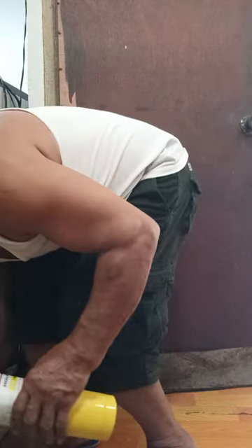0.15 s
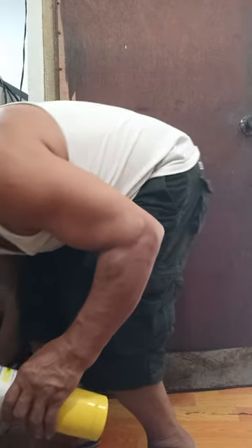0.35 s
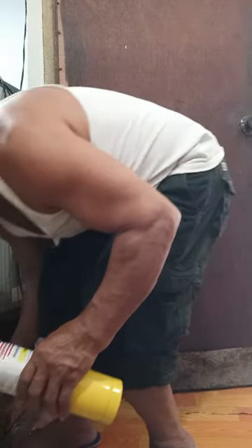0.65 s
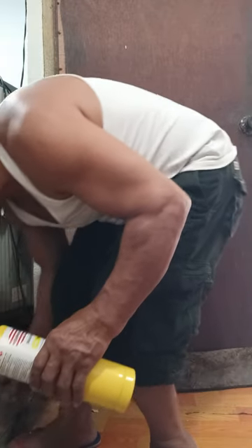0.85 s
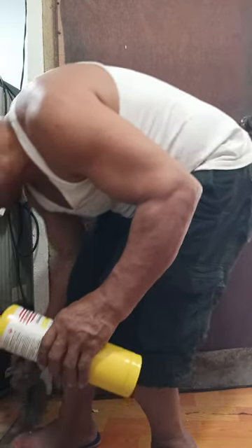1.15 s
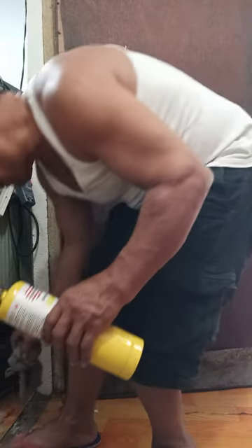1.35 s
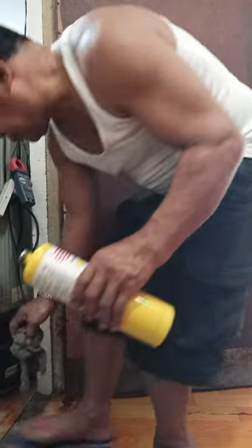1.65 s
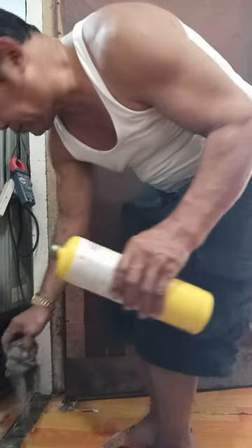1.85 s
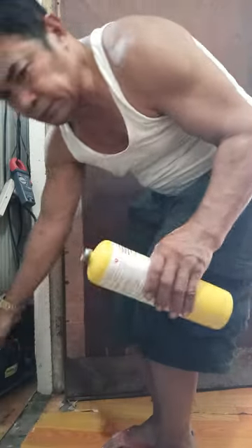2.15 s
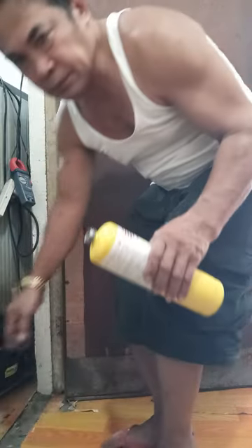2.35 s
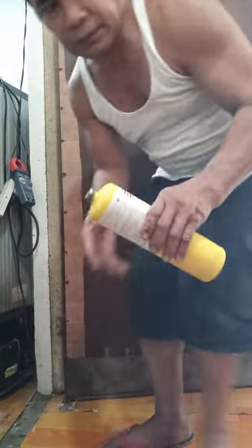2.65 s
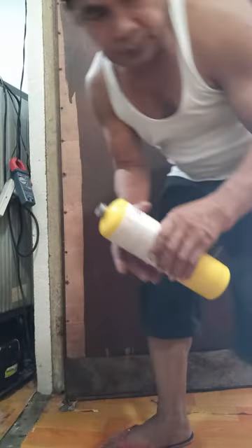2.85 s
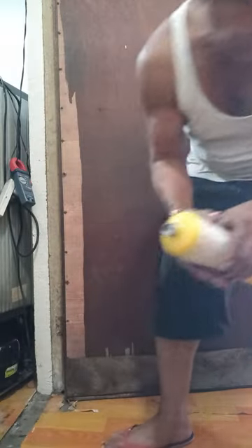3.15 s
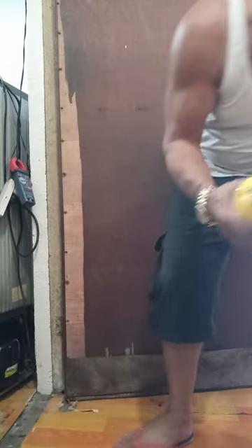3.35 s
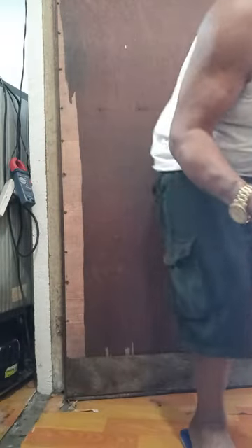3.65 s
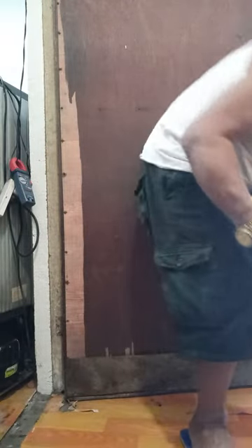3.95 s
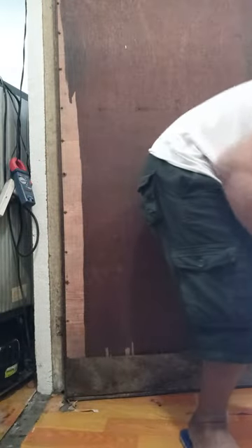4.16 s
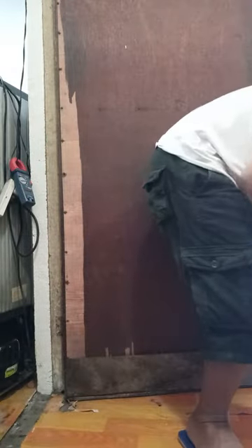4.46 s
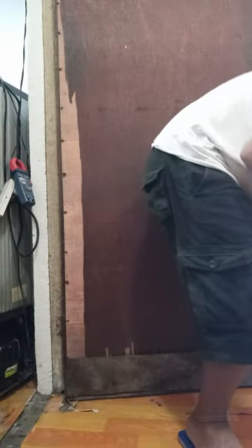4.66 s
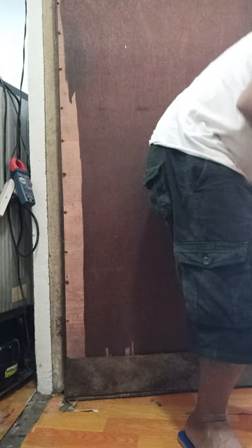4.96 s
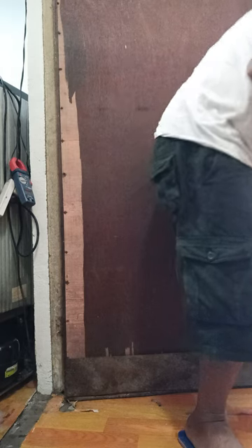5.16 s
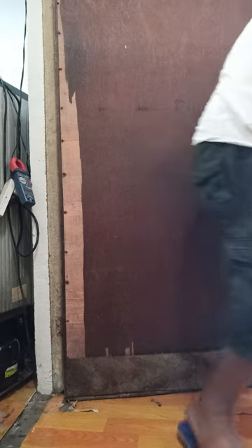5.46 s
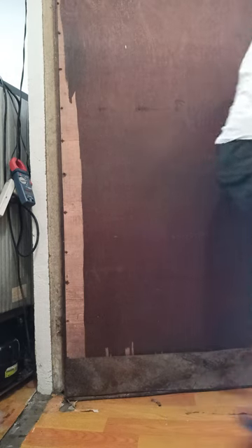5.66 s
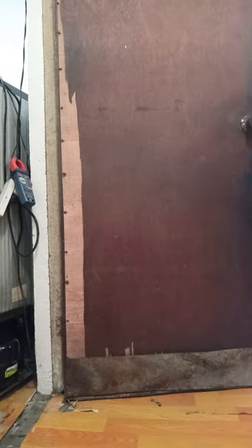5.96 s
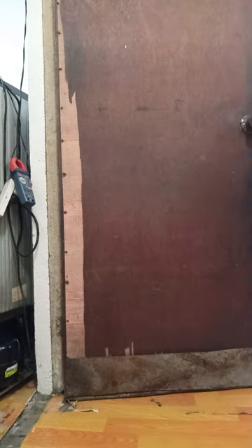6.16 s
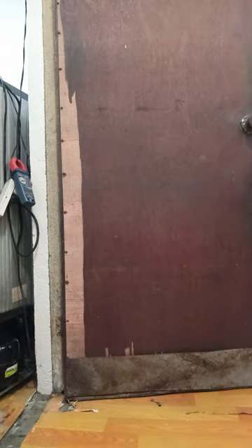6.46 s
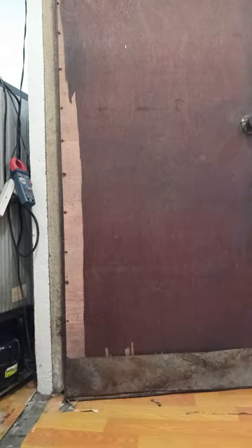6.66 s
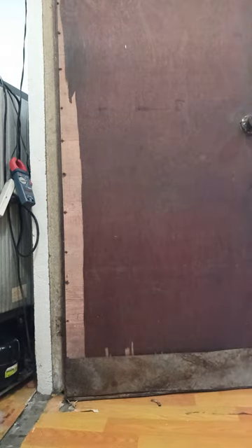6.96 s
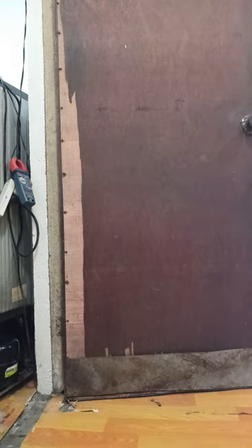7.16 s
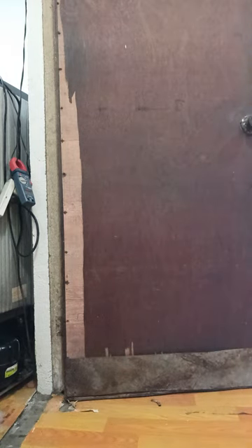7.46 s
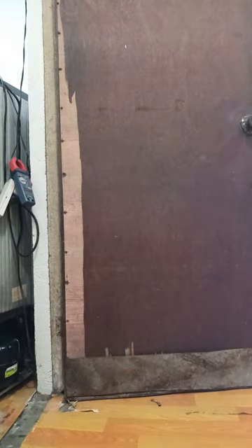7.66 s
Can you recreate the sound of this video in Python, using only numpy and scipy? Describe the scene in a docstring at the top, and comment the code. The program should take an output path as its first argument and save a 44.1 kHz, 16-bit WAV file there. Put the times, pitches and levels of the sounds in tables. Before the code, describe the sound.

Over constant machine hum and rushing air, one hard clack on the floor gives way to soft shuffles, small dry ticks and a late dull tap.

```python
"""Sandalled steps on a hard floor: one sharp clack, then a shuffle of light ticks, scuffs and rustles.
Each contact rings modes of floor and sole and adds a crack; friction is shaped noise; a small room answers.
Behind them a refrigerator runs: a compressor hums on lines locked to its shaft, and coloured noise
makes the hiss and murmur of moving air. A low fan tone sinks in the first seconds, then partly returns."""
import sys
import numpy as np
from scipy import signal
from scipy.fft import rfft, irfft, next_fast_len
from scipy.io import wavfile
from scipy.ndimage import uniform_filter1d

SR = 44100
rng = np.random.default_rng(int(sys.argv[2]) if len(sys.argv) > 2 else 0)


def persist_wave(psi):
    """Save psi, clipped to +-1, as 16-bit WAV."""
    counts = np.round(np.clip(psi, -1, 1) * 32767).astype(np.int16)
    wavfile.write(sys.argv[1], SR, np.atleast_2d(counts).T)


N = 344817
TIME = np.arange(N) / SR  # seconds


def amp(db):
    """Turns decibels into linear gain."""
    return 10 ** (np.asarray(db) / 20)


def evened(x):
    """Scales a signal to rms 1, over all its channels together."""
    return x / np.sqrt(np.mean(x ** 2) + 1e-20)


def read(points, hz):
    """Reads a curve of (frequency, value) points on a log-frequency axis."""
    point_hz, value = np.transpose(points)
    return np.interp(np.log(hz + 1), np.log(point_hz + 1), value)


def add(mix, start_s, sound):
    """Mixes a sound in at its start time, cut off at the end of the mix."""
    part = mix[..., max(round(start_s * SR), 0):][..., :sound.shape[-1]]
    part += sound[..., :part.shape[-1]]


def drift(top_hz):
    """Slow random wander of rms 1: a sum of sines no faster than top_hz."""
    t = TIME[::256]
    slow = np.zeros(len(t))
    for hz in np.geomspace(top_hz / 10, top_hz, 20):
        slow += np.sin(2 * np.pi * (hz * t + rng.random())) / np.sqrt(hz)
    return np.interp(TIME, t, evened(slow))


# How alike left and right are across the spectrum: pitch_hz [Hz], likeness [-1 to 1]
STEREO_LIKENESS = [(60, 0.82), (130, 1), (290, 0.7), (640, 0.29), (1400, -0.35), (2600, 0.057),
                   (15000, -0.032)]
# Left-over-right tilt across the spectrum: pitch_hz [Hz], left_right_db [dB]
STEREO_BALANCE = [(200, -3), (340, 10.5), (480, -1.5), (800, -1), (1400, 2), (3000, -1), (5500, 1),
                  (7300, 4), (8500, 0), (15000, -0.5)]


def pair(x, gain_db):
    """Colours two unrelated signals by gain_db(hz) and makes their bass alike, as at two close ports."""
    length = x.shape[-1]
    size = next_fast_len(length)
    hz = np.fft.rfftfreq(size, 1 / SR)
    first, second = rfft(x, size)
    likeness = np.clip(read(STEREO_LIKENESS, hz), -1, 1)
    mid = first * np.sqrt((1 + likeness) / 2)
    side = second * np.sqrt((1 - likeness) / 2)
    lean = amp(read(STEREO_BALANCE, hz) / 2)
    stereo = np.array([(mid + side) * lean, (mid - side) / lean])
    return irfft(stereo * amp(gain_db(hz)), size)[:, :length]


def murmur(level_db=-53, low_hz=205, high_hz=480, width_hz=12.7, swell_db=4.5, swell_hz=2.5, count=6):
    """Narrow bands of the low rush swell and sink, each by its own chance."""
    def band(centre_hz):
        def bell(hz):
            return -12 * np.minimum(((hz - centre_hz) / width_hz) ** 2, 10)
        noise = pair(rng.standard_normal((2, N)), bell)
        return evened(noise * amp(swell_db * drift(swell_hz)))
    bands = sum(band(hz) for hz in np.geomspace(low_hz, high_hz, count))
    return amp(level_db) * evened(bands)


# Broad colour of the rushing air: pitch_hz [Hz], relative_level_db [dB per Hz]
AIR_COLOUR = [(20, -17), (45, -24), (70, -4.5), (170, -11), (240, -2.5), (400, -5.5), (560, -0.5),
              (900, 0.5), (1100, -3.5), (1700, -5.5), (2700, -11.5), (4400, -12), (8000, -17.5),
              (15500, -19)]
# Cabinet and room resonances in that rush: pitch_hz [Hz], width_hz [Hz], lift_db [dB]
CABINET_RESONANCES = [(229, 7.7, 4), (278, 47, 4.5), (302, 20, -6), (370, 40, 6), (463, 15, 10),
                      (510, 8.4, -2.5), (756, 10, 2), (1490, 62, 2.5), (1694, 20, 6), (1915, 25, 3),
                      (2068, 42, 4)]


def air(start_db=-37.5, fall_db_per_s=0.14, flutter_db=0.5, flutter_hz=14.0):
    """Turbulent air as noise coloured by resonances; it eases very slowly and flutters a little."""
    def colour(hz):
        curve_db = read(AIR_COLOUR, hz)
        for centre_hz, width_hz, lift_db in CABINET_RESONANCES:
            curve_db += lift_db / (1 + (2 * (hz - centre_hz) / width_hz) ** 2)
        return curve_db
    rush = evened(pair(rng.standard_normal((2, N)), colour))
    return rush * amp(start_db - fall_db_per_s * TIME + flutter_db * drift(flutter_hz))


# Fader ride of the low fan tone, before its trim and waver: time_s [s], level_db [dB]
FAN_RIDE = [(0, -40.5), (1.35, -45), (1.8, -59), (2.8, -54.5), (3.2, -68), (3.8, -60), (6.3, -56.5),
            (7.82, -52.5)]
FAN_START_HZ, FAN_SAG_HZ_PER_S = 76.9, 0.07
DRONE_HZ = 63.3


def fan(trim_db=-0.5, waver_db=3.0, waver_hz=3.0, octave_db=-61, octave_share=0.22,
        drone_db=-65, drone_share=0.8, third_db=-2):
    """The wavering blade tone; its weak octave and a drone below it follow its level in part."""
    ride_s, ride_db = np.transpose(FAN_RIDE)
    level_db = np.interp(TIME, ride_s, ride_db)
    mean_db = level_db.mean()
    excess_db = level_db - mean_db
    angle = 2 * np.pi * np.cumsum(FAN_START_HZ - FAN_SAG_HZ_PER_S * TIME) / SR
    # the waver ignores the ride, so it shows most when the tone is faint
    waver = amp(mean_db) * (amp(waver_db * drift(waver_hz)) - 1)
    blades = amp(trim_db) * (amp(level_db) + waver) * np.sin(angle)
    octave = amp(octave_db + octave_share * excess_db) * np.sin(2 * angle)
    turn = 2 * np.pi * (DRONE_HZ * TIME + rng.random())
    drone = np.sin(turn) + amp(third_db) * np.sin(3 * turn)
    return np.sqrt(2) * (blades + octave + amp(drone_db + drone_share * excess_db) * drone)


SHAFT_HZ = 57.48
# Compressor lines: shaft_multiple [x shaft speed], level_db [dB], left_right_db [dB]
HUM_LINES = [(1, -59, -0.5), (1.5, -83, 4), (2, -51.5, 1), (3, -62.5, 0), (3.5, -64.5, -1), (4, -59.5, 0.5),
             (5, -49.5, -0.5), (6, -56.5, 0.5), (8, -60.5, 3), (9, -60, 12.5), (12, -66.5, 14),
             (13, -63, -5)]
WHINE_LINE = (46, -68, 12)  # a thin whine high on the same series, same columns


def compressor(sway_turns=0.016, sway_hz=1.505, waver_db=1.0, waver_hz=3.0):
    """Lines locked to whole and half orders of the shaft; its speed sways and each line wavers."""
    turns = SHAFT_HZ * TIME + sway_turns * drift(sway_hz)
    out = np.zeros((2, N))
    for multiple, level_db, left_right_db in HUM_LINES + [WHINE_LINE]:
        line = np.sqrt(2) * np.sin(2 * np.pi * (multiple * turns + rng.random()))
        pan = amp([[left_right_db / 2], [-left_right_db / 2]])
        out += line * amp(level_db + waver_db * drift(waver_hz)) * pan
    return out


# Reverberation by band: pitch_hz [Hz], t60_s [s]
ROOM_DECAY = [(150, 0.59), (600, 0.34), (2000, 0.27), (7000, 0.35), (15000, 0.25)]
# Single early reflections off floor, door and walls: left_delay_s [s], right_delay_s [s], level_db [dB]
EARLY_ECHOES = [(.0047, 0.0035, -11), (.0068, 0.0084, -8.5), (0.015, .0146, -12)]


def room(x, wet_db=-1.5, first_s=0.002):
    """A few single reflections and a dense tail, each band dying at its own speed."""
    size = SR // 2
    t = np.arange(size) / SR
    signs = rng.choice([-1., 1.], (2, size))
    taps = signs * (rng.random((2, size)) < 1 / 10) * (t > first_s)
    hz, at_s, bands = signal.stft(pair(taps, np.zeros_like), SR, nperseg=256)
    decay = amp(-60 * at_s / read(ROOM_DECAY, hz)[:, None])
    tail = signal.istft(bands * decay, SR, nperseg=256)[1]
    tail *= amp(wet_db) * np.sqrt(2) / np.linalg.norm(tail)
    for left_s, right_s, level_db in EARLY_ECHOES:
        add(tail[0], left_s, amp([level_db]))
        add(tail[1], right_s, amp([level_db]))
    return signal.fftconvolve(x[None], tail, axes=1)[:, :N]


# Booms of the floor where weight comes down: start_s [s], pitch_hz [Hz], level_db [dB]
FLOOR_BOOMS = [(1.895, 178, -27), (2.868, 122, -32), (7.23, 224, -39)]


def booms(rise_s=0.005, t60_s=0.14):
    """One low mode of the floor swells and dies under each heavy step."""
    t = np.arange(SR // 2) / SR
    out = np.zeros(N)
    for start_s, pitch_hz, level_db in FLOOR_BOOMS:
        envelope = (1 - np.exp(-t / rise_s)) * amp(level_db - 60 * t / t60_s)
        add(out, start_s, envelope * np.sin(2 * np.pi * pitch_hz * t))
    return out


# Scuffs of sandals and cloth, fizz before its lift:
# peak_s [s], rise_s [s], decay_s [s], rasp_db [dB], hiss_db [dB], fizz_db [dB]
SCUFF_STROKES = [(2.63, 0.14, .055, -43, -56, -52), (2.872, .028, .032, -38.5, -41, -52),
                 (3.249, 0.026, 0.052, -37, -30.5, -43.5), (3.595, 0.072, 0.076, -45, -48, -47.5),
                 (3.738, 0.068, 0.04, -32.5, -34, -34), (3.918, 0.049, 0.036, -37, -44, -41),
                 (5.6, 0.063, 0.036, -44, -51, -51), (5.885, .04, .05, -47, -49, -45),
                 (6.19, 0.057, .07, -48, -46, -46), (6.415, 0.059, 0.073, -53, -48, -40),
                 (6.57, 0.024, 0.065, -55, -34, -48), (7.23, .014, 0.035, -43, -60, -64)]
# Low, rough colour of a scuff: pitch_hz [Hz], relative_level_db [dB per Hz]
RASP_COLOUR = [(100, -14), (300, 0), (1000, -2), (1600, -2.5), (4300, 2), (6500, -4), (15000, -42)]
# Middle colour, mostly above 4 kHz: pitch_hz [Hz], relative_level_db [dB per Hz]
HISS_COLOUR = [(100, -37), (2000, -22), (4000, -8), (6000, -3), (7200, 0.5), (8300, -6), (11000, 1),
               (16000, -37)]
# Topmost colour: pitch_hz [Hz], relative_level_db [dB per Hz]
FIZZ_COLOUR = [(100, -40), (5000, -27), (9000, -6.5), (12000, -3), (14000, 2), (16000, -0.5)]


def scuffs(grain_db=2.2, grain_s=0.0038, fizz_lift_db=7):
    """Friction noise swells and dies with each stroke, grainy where the surfaces catch."""
    smooth = uniform_filter1d(rng.standard_normal(N), max(int(grain_s * SR), 1))
    grain = amp(grain_db * evened(smooth))
    out = np.zeros((2, N))
    layers = [(RASP_COLOUR, 0), (HISS_COLOUR, 0), (FIZZ_COLOUR, fizz_lift_db)]
    for k, (colour, lift_db) in enumerate(layers):
        power = np.zeros(N)  # overlapping strokes add in power
        for peak_s, rise_s, decay_s, *levels_db in SCUFF_STROKES:
            t = np.arange(-2 * rise_s, 10 * decay_s, 1 / SR)
            stroke = np.exp(np.where(t < 0, -2 * (t / rise_s) ** 2, -t / decay_s))
            add(power, peak_s - 2 * rise_s, (amp(levels_db[k] + lift_db) * stroke) ** 2)
        noise = pair(rng.standard_normal((2, N)), lambda hz: read(colour, hz))
        out += np.sqrt(power) * evened(noise)
    return out * evened(grain)


def ring(modes, t, scatter=0.021):
    """Decaying modes set off by one blow, a little different in pitch each time."""
    out = np.zeros(len(t))
    for k, (hz, level_db, t60_s) in enumerate(modes):
        pitch_hz = hz * rng.normal(1, scatter)
        out += (-1) ** k * amp(level_db - 60 * t / t60_s) * np.sin(2 * np.pi * pitch_hz * t)
    return out


# Footfalls, thud and clack before their trims:
# start_s [s], thud_db [dB], clack_db [dB], crack_db [dB], contact_s [s]
FOOTFALLS = [(1.8609, -12, -35, -25.5, 0.0033), (1.8763, -21, -34, -29, 0.0097),
             (1.894, -27, -7.5, -16.5, 0.0037), (2.864, -26, -25, -25.5, 0.0036),
             (2.895, -29.5, -25.5, -35, 0.002), (3.733, -37, -25, -23, 0.0032),
             (7.2187, -20.5, -25, -44, 0.0094)]
# Light dry ticks of grit and sandal straps: start_s [s], level_db [dB]
GRIT_TICKS = [(2.845, -26), (2.876, -27), (3.714, -27), (5.6157, -19.5), (5.8635, -38), (6.204, -36),
              (6.361, -35)]
# a tick barely stirs floor and sole: dB against its own level, before the trims
TICK_CONTACT_S, TICK_THUD_DB, TICK_CLACK_DB = 0.0011, -15, -11
# Modes of the floor under a heel: pitch_hz [Hz], relative_level_db [dB], t60_s [s]
HEEL_MODES = [(133, -36, 0.052), (228, -3, 0.084), (320, -3.5, 0.024), (488, -5.5, 0.081),
              (704, -10, 0.045), (960, -9, 0.023)]
# Modes of a slapping sole: pitch_hz [Hz], relative_level_db [dB], t60_s [s]
SOLE_MODES = [(186, -23, 0.11), (463, -24.5, 0.015), (1090, -9, 0.021), (1440, 0, 0.023), (1726, 6, 0.012),
              (2250, 1.5, 0.013), (2780, -7.5, 0.0057), (3240, -1, 0.019)]
# Colour of the crack at the contact: pitch_hz [Hz], relative_level_db [dB per Hz]
CRACK_COLOUR = [(100, -8), (1000, 4), (3000, 1.5), (5500, -2.5), (8200, 0.5), (12000, 1.5), (16000, -7)]


def knocks(settle_share=0.47, thud_trim_db=-6.0, clack_trim_db=-5.0):
    """A first touch and a burst of tiny contacts thud in the floor, ring in the sole and crackle."""
    size = SR // 3
    t = np.arange(size) / SR
    crack_gain = amp(read(CRACK_COLOUR, np.fft.rfftfreq(size, 1 / SR)))
    ticks = [(start_s, db + TICK_THUD_DB, db + TICK_CLACK_DB, db, TICK_CONTACT_S)
             for start_s, db in GRIT_TICKS]
    out = np.zeros(N)
    for start_s, thud_db, clack_db, crack_db, contact_s in FOOTFALLS + ticks:
        fade = np.exp(-t / contact_s)
        burst = rng.standard_normal(size) * fade
        # a slow landing has a soft first touch
        touch = signal.unit_impulse(size) * np.exp(-contact_s / 0.016)
        force = touch + settle_share * burst / np.linalg.norm(burst)
        thud = amp(thud_db + thud_trim_db) * ring(HEEL_MODES, t)
        clack = amp(clack_db + clack_trim_db) * ring(SOLE_MODES, t)
        crack = evened(irfft(rfft(rng.standard_normal(size)) * crack_gain, size)) * fade
        body = signal.fftconvolve(force, thud + clack)[:size]
        add(out, start_s, body + amp(crack_db) * crack)
    return signal.sosfilt(signal.butter(2, 110, "highpass", fs=SR, output="sos"), out)


def scene(port_lag_s=0.000202):
    """The machine, and the steps with their reflections."""
    machine = murmur() + air() + fan() + compressor()
    steps = knocks()
    # steps reach the left port first
    direct = np.array([steps, np.roll(steps, round(port_lag_s * SR))])
    return machine + room(steps) + booms() + scuffs() + direct


# Overall colour, lifted around 7 kHz, with a deep gap from about 8.7 to 11.6 kHz:
# pitch_hz [Hz], gain_db [dB]
OVERALL_COLOUR = [(30, -5), (54, -0.5), (4650, 3), (4850, -4), (6000, -2), (6250, 5.5), (6800, 8),
                  (7020, 4), (7570, 9.5), (7780, 3.5), (8450, 2.5), (8750, -20.5), (11350, -80),
                  (11650, -5)]
EDGE_HZ = 15780


def record(dry):
    """Colours the whole sound, then cuts everything above the band edge."""
    size = next_fast_len(N + 4096)
    gain = amp(read(OVERALL_COLOUR, np.fft.rfftfreq(size, 1 / SR)))
    heard = irfft(rfft(dry, size) * gain, size)[:, :N]
    lowpass = signal.firwin(511, EDGE_HZ, window=("kaiser", 9), fs=SR)
    return signal.oaconvolve(heard, lowpass[None], "same", axes=1)


dry = scene()
out = record(dry)
persist_wave(out)
```